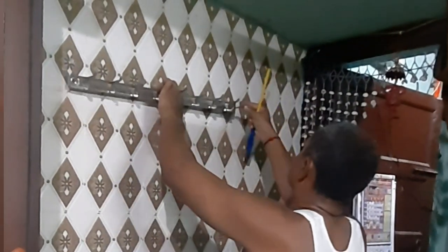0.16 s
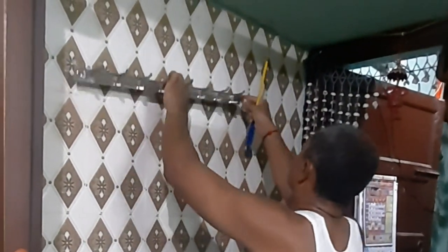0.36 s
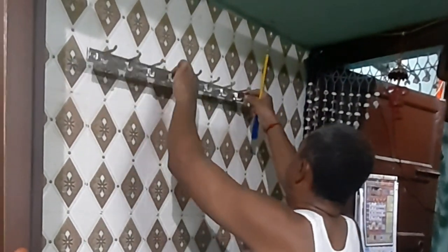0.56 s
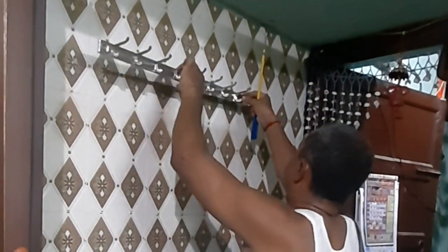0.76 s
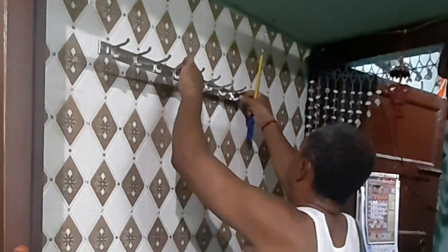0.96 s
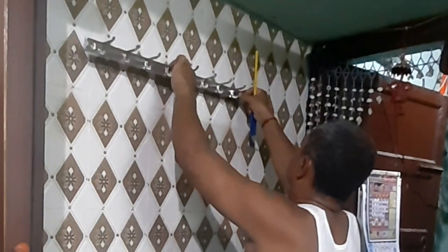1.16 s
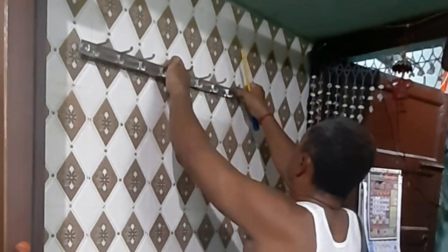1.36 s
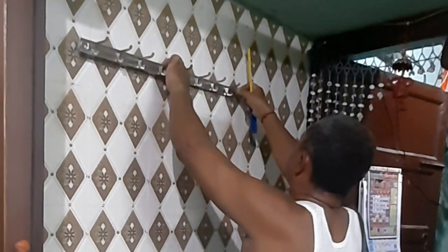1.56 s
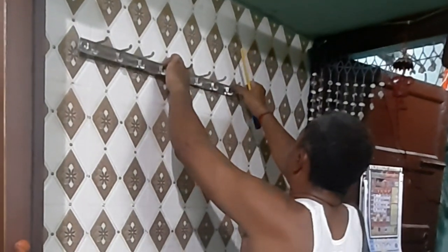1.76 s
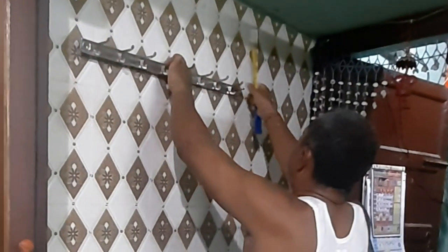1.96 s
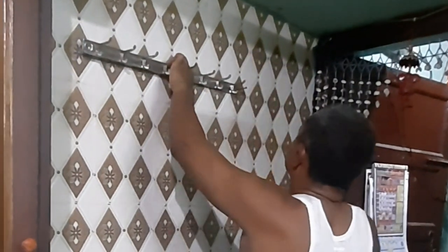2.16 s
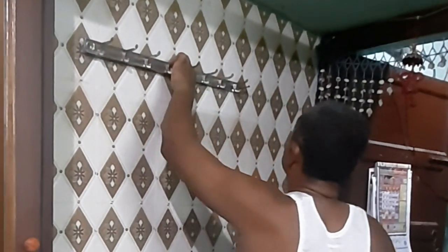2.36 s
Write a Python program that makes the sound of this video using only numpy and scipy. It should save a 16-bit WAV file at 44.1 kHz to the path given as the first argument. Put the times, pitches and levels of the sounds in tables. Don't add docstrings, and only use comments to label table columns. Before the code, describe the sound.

A metal hook rail chatters and scrapes brightly on a tiled wall, ticks lightly, then after a pause knocks harder and duller; small room, soft machine pulsing next door, close stereo phone microphone.

```python
import sys
import numpy as np
from scipy import signal
from scipy.fft import rfft, irfft, next_fast_len
from scipy.io import wavfile
from scipy.ndimage import uniform_filter1d

SR = 44100
rng = np.random.default_rng(int(sys.argv[2]) if len(sys.argv) > 2 else 0)


def wav_record(signal):
    frames = np.transpose(np.atleast_2d(signal))
    bounded = np.clip(frames, -1, 1)
    quanta = np.round(bounded * 32767).astype(np.int16)
    wavfile.write(sys.argv[1], SR, quanta)


def boost(x):
    u = np.asarray(x, float) / 20
    return 10 ** u


N = 110250


# (time [s], peak level [dB], contact pitch [Hz], free ringing [dB])
LOOSE_TAPS = [(.2352, -24, 6460, -10), (.2362, -28.5, 4800, 1), (.2368, -31.5, 2400, 1),
              (.2385, -28, 11900, -15), (.242, -33, 3830, -7.5), (.261, -48, 7900, -15),
              (.3007, -32.5, 6000, -12), (.3672, -42, 7450, 8), (.3695, -35, 10400, -1),
              (.383, -40, 5230, 1), (.3855, -29, 10200, 7), (.3948, -21, 7400, -2), (.4005, -26, 7500, -2),
              (.4045, -21, 10500, 4), (.412, -29, 5400, 12), (.418, -26.5, 5500, 4),
              (.4225, -23.5, 7560, 4), (.428, -29, 7740, 0), (.4355, -24, 7500, -1), (.4415, -17, 8500, -3),
              (.4435, -21, 4570, -5), (.4478, -20.5, 12600, -8), (.449, -27, 2300, 5),
              (.463, -36, 12000, -3), (.473, -38, 7500, -1), (.5235, -50, 7540, 8), (.527, -44, 9000, 4),
              (.531, -39, 4100, 7.5), (.533, -29.5, 10500, 5), (.539, -30, 9100, 1.5),
              (.548, -41, 7400, -4), (.556, -41, 7640, 1), (.648, -39.5, 7000, -5),
              (.6695, -36.5, 6000, -14), (.672, -38, 7850, 0.5), (.6775, -38.5, 7900, -2),
              (.7933, -42, 6850, -7), (1.1225, -57, 7300, 1), (1.253, -42.5, 7600, -3),
              (1.263, -40, 4970, 5), (1.268, -42, 4100, 2), (1.2735, -41, 7420, 6.5), (1.279, -41, 5000, 4),
              (1.774, -51.5, 7800, -5), (2.001, -49, 7000, -10)]
# (time [s], pressure [dB], grit sharpness [0-1])
LOOSE_SKATE = [
    (.366, -59, .5),
    (.371, -40.5, 0.26),
    (.383, -38, .4),
    (.395, -26, 0.74),
    (.42, -26, 0.47),
    (.449, -28.5, 0.65),
    (.457, -48, 0.4),
    (.48, -51, 0.9),
    (.5, -46, 0.3),
]
# (time [s], pressure [dB], grit sharpness [0-1])
LOOSE_SKATE_AGAIN = [
    (0.516, -47, 0.6),
    (0.525, -40.5, .8),
    (.536, -42, .8),
    (.545, -38.5, 0.95),
    (.56, -52, 0.92),
    (0.594, -51.5, 0.63),
    (.61, -85, .5),
]
# (frequency [Hz], level [dB], t60 [s])
LOOSE_MODES = [(2277, -8, 0.13), (2416, -11, 0.12), (2876, -22, 0.12), (4060, -12, 0.13),
               (4820, -18, 0.053), (5110, -11.5, 0.027), (5430, -14, 0.04), (6000, -12, 0.079),
               (7190, -10, 0.04), (7540, -2, 0.066), (7655, 0, 0.06), (8500, -20, 0.044),
               (10360, -10.5, 0.1), (11620, -18, 0.045)]
# (frequency [Hz], level [dB])
LOOSE_THICKET = [(1800, -28.5), (3300, -34.5), (4700, -25), (7500, -21), (9200, -31), (11000, -26.5),
                 (13000, -26), (15700, -29.5)]


def loose_rail():
    modes = body(LOOSE_MODES, LOOSE_THICKET)
    return rail(LOOSE_TAPS, [LOOSE_SKATE, LOOSE_SKATE_AGAIN], modes, tap_db=-4)


# (time [s], peak level [dB], contact pitch [Hz], free ringing [dB])
PRESSED_TAPS = [(1.239, -41, 5300, -10), (1.3005, -26, 11000, -3), (1.303, -25, 13800, -5),
                (1.31, -24, 4240, -0.5), (1.316, -11, 7500, -5), (1.3186, -15, 10500, -3),
                (1.3225, -17.5, 3180, 3), (1.327, -23, 4300, 5), (1.333, -28, 11500, -2),
                (1.3452, -15, 8200, -1), (1.348, -16.5, 12000, 7), (1.351, -30, 4200, 8),
                (1.359, -21.5, 2970, 6.5), (1.3685, -30.5, 6560, 2), (1.382, -36, 7800, 0),
                (1.397, -42, 7500, 5)]
# (time [s], pressure [dB], grit sharpness [0-1])
PRESSED_SKATE = [
    (1.24, -62, .2),
    (1.255, -61, 0.26),
    (1.265, -45.5, 0.37),
    (1.28, -41.5, 0.32),
    (1.3, -37.5, 0.42),
    (1.325, -28.5, .4),
    (1.365, -35, .5),
    (1.385, -47, .5),
    (1.41, -62, .4),
]
# (frequency [Hz], level [dB], t60 [s])
PRESSED_MODES = [(2254, -13.5, 0.077), (2565, -1.5, 0.1), (2897, -3.5, 0.1), (3810, -3.5, 0.028),
                 (3995, -8, 0.07), (4300, -5.5, 0.053), (4800, -2, 0.03), (5070, -4.5, 0.047),
                 (6000, -6.5, 0.063), (7200, -11, 0.04), (7600, -18, 0.038), (7900, -17, 0.062),
                 (11000, -22, 0.05), (11600, -20, 0.05)]
# (frequency [Hz], level [dB])
PRESSED_THICKET = [(2000, -32), (3300, -26.5), (4300, -14), (6500, -23.5), (7800, -14), (9300, -29.5),
                   (11500, -19.5), (15700, -23.5)]


def pressed_rail():
    modes = body(PRESSED_MODES, PRESSED_THICKET)
    return rail(PRESSED_TAPS, [PRESSED_SKATE], modes, tap_db=-3.5)


def rail(taps, skates, modes, tap_db):
    click_db = -2
    strong, small = modes
    free, held = contacts(taps, tap_db, abs(small).max())
    grit = skating(skates) / np.linalg.norm(strong.sum(0)[0] + small[0])
    rung = signal.fftconvolve((free + grit)[None], strong, axes=2)[..., :N] * choking()
    rattle = signal.fftconvolve(held + grit, small, axes=1)[:, :N]
    return rung.sum(0) + rattle + boost(click_db) * abs(small).max() * held


def contacts(taps, tap_db, small_peak):
    chatter_s, chatter_db, damping = 0.0014, 3, 2.8
    free, held = np.zeros((2, N)), np.zeros((2, N))
    t = np.arange(256) / SR
    chance = rng.random((60, 2, 4, 2))
    for (start_s, db, hz, ring_db), (late, size) in zip(taps, chance.transpose(0, 3, 1, 2)):
        since = np.maximum(t - chatter_s * late[..., None], 0)
        first = pulse(t, hz, damping)
        again = (2 * size[..., None] - 1) * pulse(since, hz, damping)
        blow = first + boost(chatter_db) * again.sum(1)
        blow *= boost(db + tap_db) / np.linalg.norm(blow[0]) / small_peak
        start = round(start_s * SR)
        held[:, start:][:, :256] += blow
        free[:, start:][:, :256] += blow * boost(ring_db)
    return free, held


def pulse(t, hz, damping):
    return np.cos(2 * np.pi * hz * t) * t ** 2 * np.exp(-t * hz * damping)


def skating(skates):
    grit_per_s, spread_db, grit_apart = 2000, 3, 0.6
    t = np.arange(N) / SR
    hits = rng.random(N) < grit_per_s / SR
    hail = hits * boost(spread_db * np.minimum(rng.exponential(1, N), 4))
    hail = hail * (rng.standard_normal(N) + grit_apart * rng.standard_normal((2, N)))
    dull = evened(uniform_filter1d(hail, size=3))
    sharp = evened(np.diff(hail, prepend=0))
    grit = 0
    for when, db, edge in map(np.transpose, skates):
        edge = np.clip(np.interp(t, when, edge), 0, 1)
        pressure = boost(np.interp(t, when, db, -120, -120))
        grit = grit + pressure * ((1 - edge) * dull + edge * sharp)
    return grit


def choking():
    flutter_db = 2.5
    drift = uniform_filter1d(rng.standard_normal((4, 1, N)), size=180)
    drift = uniform_filter1d(drift, size=180)
    flutter = boost(flutter_db * evened(drift))
    return flutter / np.sqrt(np.mean(flutter ** 2))


def body(modes, thicket, count=200):
    pair_hz, thicket_t60_s = 32, 0.032
    hz, db, t60 = np.repeat(modes, 2, axis=0).T
    hz = hz + pair_hz * np.tile([-.5, .5], len(modes))
    strong = np.array([ring(hz[k::4], db[k::4] - 3, t60[k::4]) for k in range(4)])
    hz = np.linspace(thicket[0][0], thicket[-1][0], count)
    u = rng.random(count)
    return strong, ring(hz + 60 * u, read(thicket, hz) + 4, thicket_t60_s * (.5 + u))


def ring(hz, db, t60):
    t = np.arange(SR // 4) / SR
    u = rng.random((2, len(hz), 2, 1))
    phase, strength_db = u[:, :, 0], 7.2 * u[:, :, 1]
    fade_db = db[:, None] - 10 * np.log10(t60[:, None] / .1) - 60 * t / t60[:, None]
    return (boost(fade_db + strength_db) * np.sin(2 * np.pi * (hz[:, None] * t + phase))).sum(1)


def room(x):
    room_db, t60_s, top_t60_s = -7, 0.16, 0.15
    hz, t, z = signal.stft(rng.standard_normal((2, SR // 2)), SR, nperseg=256)
    t60 = read([(2000, t60_s), (14000, top_t60_s)], hz)[:, None]
    tail = signal.istft(z * boost(-60 * t / t60) * (t > .004), SR, nperseg=256)[1]
    wet = signal.fftconvolve(x, tail / np.linalg.norm(tail[0]), axes=1)[:, :N]
    return x + boost(room_db) * wet


# (start [s], length [s], throb level [dB], hiss level [dB])
STROKES = [(.01, 0.029, -45, -58.5), (0.141, 0.1, -47, -55.5), (0.356, 0.13, -49.5, -54),
           (0.548, 0.11, -48, -56.5), (0.755, 0.093, -47, -61), (0.954, 0.092, -48, -61.5),
           (1.143, 0.15, -51.5, -54), (1.345, 0.071, -45, -75), (1.54, 0.087, -50.5, -61),
           (1.735, 0.058, -49, -70), (1.934, 0.043, -45, -56), (2.13, 0.081, -48, -61.5),
           (2.32, 0.064, -48.5, -60.5)]
# (frequency [Hz], width [Hz], level [dB])
CASING = [(228.6, 34, -6.5), (317.2, 35, -1.5), (374.1, 31.6, -1.5), (652, 39.5, -9), (870, 196, -10.5),
          (912.5, 28, -2.5), (1920, 590, -20.5)]
# (frequency [Hz], density [dB per Hz])
PUFF = [(590, -42), (1000, -5), (1340, -7), (2250, 1), (2530, -13), (4680, -15.5), (7350, -15.5),
        (9170, -40), (16000, -47)]


def machine():
    rise_s, fall_s, idle_db = 0.03, 0.058, -59.5

    def resonances(hz):
        return np.sqrt(sum(boost(2 * db) / (1 + (2 * (hz - f) / w) ** 2) ** 2 for f, w, db in CASING))

    casing = noise(resonances, patchy_db=1.5)
    puff = noise(lambda hz: boost(read(PUFF, hz)), patchy_db=5.0)
    throb = boost(idle_db) + sum(swell(s, n, db, rise_s, fall_s) for s, n, db, _ in STROKES)
    hiss = sum(swell(s, n, db, rise_s, fall_s) for s, n, _, db in STROKES)
    return casing * throb + puff * hiss


# (start [s], length [s], level [dB])
RUSTLES = [(0.011, 0.064, -59.5), (0.2, 0.076, -55.5), (0.95, 0.036, -59.5), (1.154, 0.026, -58.5),
           (1.436, 0.098, -69.5), (1.767, 0.013, -62), (1.966, 0.044, -56), (2.061, 0.056, -60),
           (2.148, 0.048, -67.5), (2.357, 0.045, -64), (2.426, .015, -61.5)]
# (frequency [Hz], density [dB per Hz])
RUSTLE_SPECTRUM = [(1470, -12.5), (2500, -8.5), (3830, -1), (4210, -10), (4880, -0.5), (7360, -1),
                   (9290, -19), (12400, -8), (16000, -14)]
# (frequency [Hz], level [dB])
WALL_SPECTRUM = [(400, -14), (800, -1.5), (1200, -5), (1700, -2), (2300, -44)]
# (start [s], length [s], level [dB])
WALL_RUB = (1.265, 0.09, -42)


def rustles():
    swish = noise(lambda hz: boost(read(RUSTLE_SPECTRUM, hz)), patchy_db=2.5)
    swish = swish * sum(swell(*row, rise=0.012, fall=0.03) for row in RUSTLES)
    rub = noise(lambda hz: boost(read(WALL_SPECTRUM, hz)) * (hz > 300) * (hz < 2600), patchy_db=2.5)
    return swish + rub * swell(*WALL_RUB, rise=0.016, fall=0.015)


# (frequency [Hz], density [dB per Hz])
RUMBLE = [(22, -12), (52, 0), (150, -7), (350, -3.5), (550, -10.5), (950, -13), (2100, -22), (3000, -44)]
# (frequency [Hz], density [dB per Hz])
AIR = [(1470, -54), (2500, -9), (3600, -13), (4550, -19), (4730, -13), (5560, -16.5), (6860, -3.5),
       (10500, -28.5), (16000, -22.5)]


def floor():
    rumble_db, air_db = -50.5, -67
    rumble = noise(lambda hz: boost(read(RUMBLE, hz)) * (hz < 3500), patchy_db=2.0)
    air = noise(lambda hz: boost(read(AIR, hz)), patchy_db=3.0)
    return boost(rumble_db) * rumble + boost(air_db) * air


# (frequency [Hz], likeness [0-1])
SAME = [(60, 0.97), (150, 1), (300, 0.91), (700, 0.16), (1400, 0.41), (3000, 0.079), (8000, 0.044)]


def noise(shape, patchy_db):
    hz = np.fft.rfftfreq(2048, 1 / SR)
    a, b, c, d, patch = rng.standard_normal((N // 512 + 5, 1025, 5)).T
    patch = uniform_filter1d(patch, size=16, axis=0)
    patch = evened(uniform_filter1d(patch, size=4, axis=1))
    same = np.clip(read(SAME, hz), 0, 1)[:, None]
    left = a + 1j * b
    right = same * left + np.sqrt(1 - same ** 2) * (c + 1j * d)
    z = np.array([left, right]) * shape(hz)[:, None] * boost(patchy_db * patch)
    return evened(signal.istft(z, nperseg=2048, noverlap=1536)[1][:, :N])


def swell(start, length, db, rise, fall):
    t = np.arange(N) / SR - start
    return boost(db) * np.clip(t / rise, 0, 1) * np.exp(-np.maximum(t - length, 0) / fall)


def read(points, hz):
    f, value = np.transpose(points)
    return np.interp(np.log(hz + 1), np.log(f + 1), value)


def evened(x):
    return x / np.sqrt(np.mean(x ** 2) + 1e-20)


def scene():
    loose = loose_rail()
    pressed = pressed_rail()
    return room(loose + pressed) + machine() + rustles() + floor()


def band_limit(x):
    return signal.sosfilt(signal.butter(12, 16270, fs=SR, output="sos"), x)


# (frequency [Hz], left over right [dB])
PORTS = [(60, 6.5), (380, 2), (800, 4.5), (4400, 2), (7300, 10.5), (8600, 10), (10500, -11), (15000, -1)]


def record(dry):
    lag_s, edge_hz = 0.0003224, 15950
    size = next_fast_len(N + 512)
    hz = np.fft.rfftfreq(size, 1 / SR)
    tilt = boost(read(PORTS, hz) / 2)
    edge = 1 / (1 + (hz / edge_hz) ** 120)
    ports = np.array([tilt + 0j, np.exp(-2j * np.pi * hz * lag_s) / tilt])
    mix = irfft(rfft(dry, size) * ports * edge, size)[:, :N]
    return band_limit(mix)


dry = scene()
out = record(dry)
wav_record(out)
```